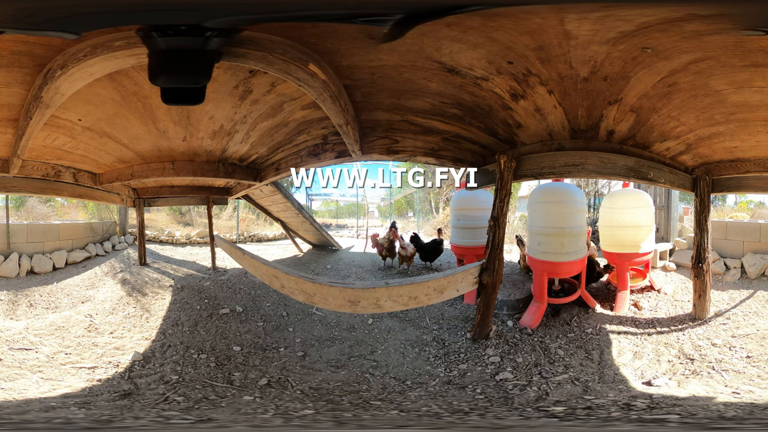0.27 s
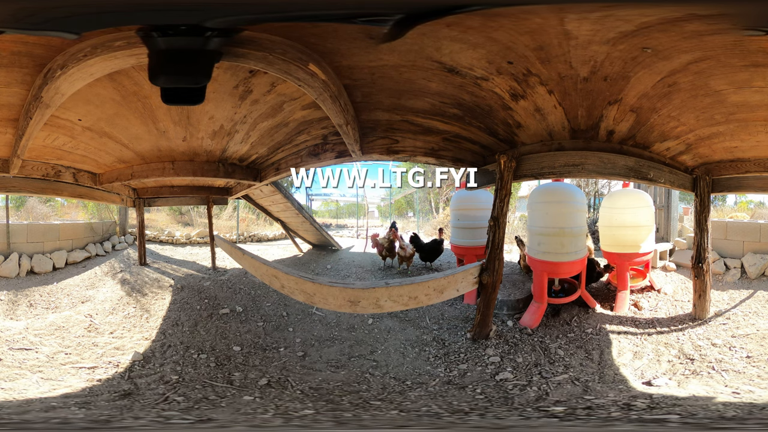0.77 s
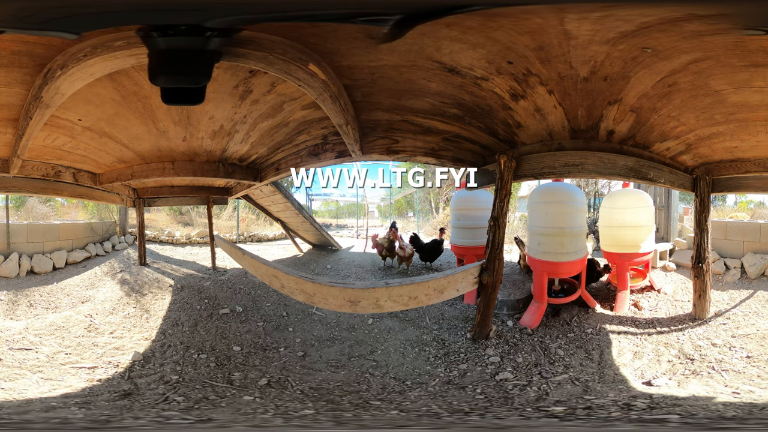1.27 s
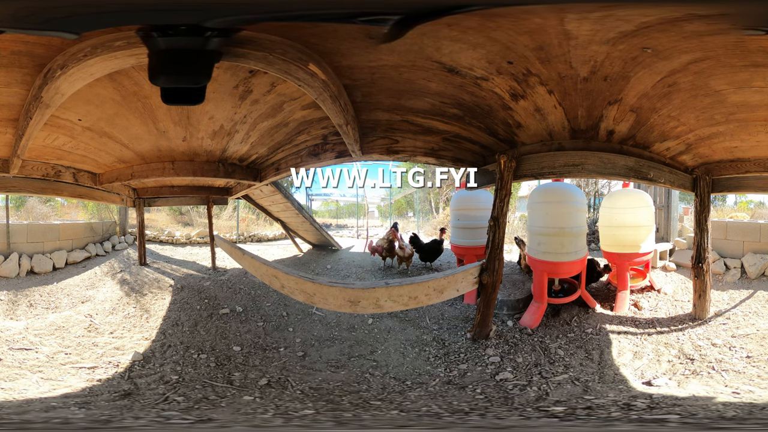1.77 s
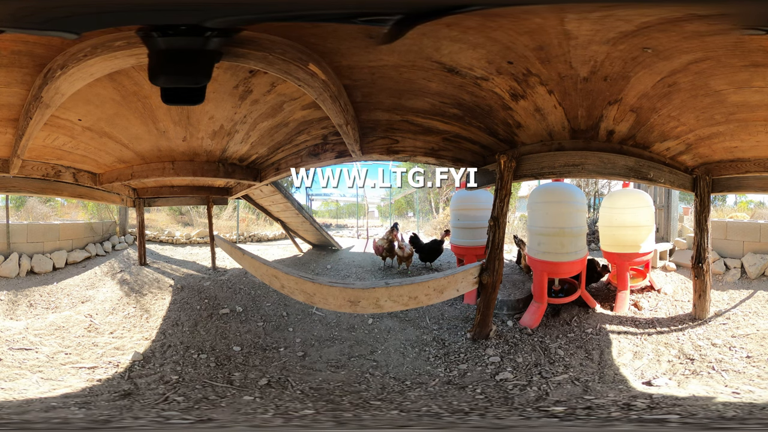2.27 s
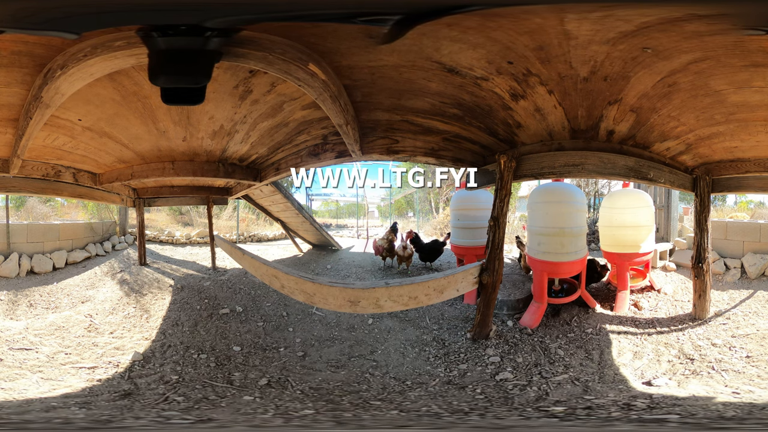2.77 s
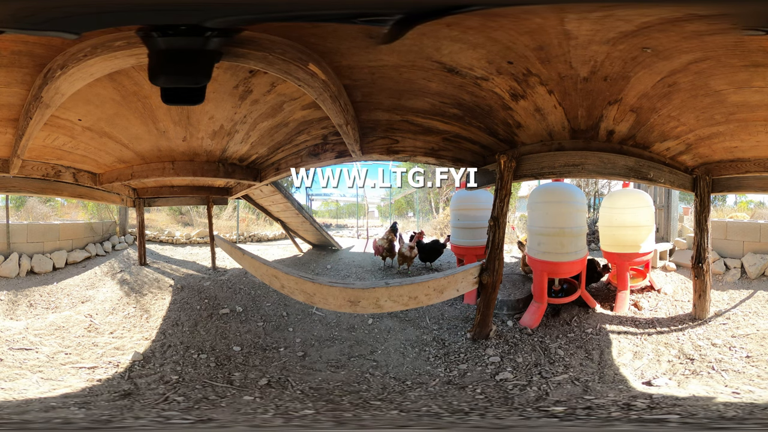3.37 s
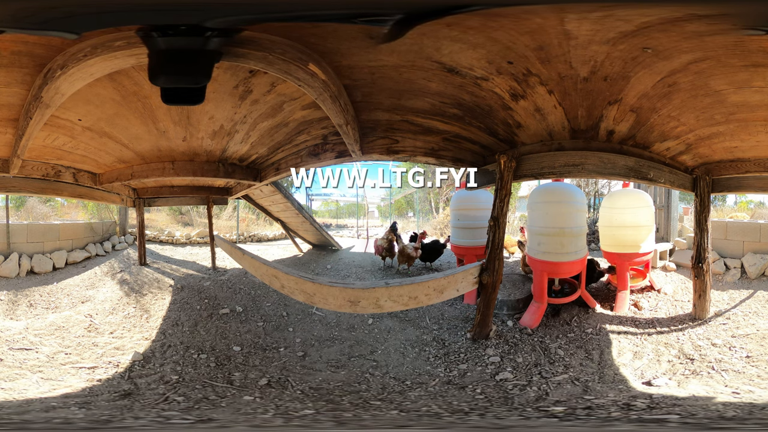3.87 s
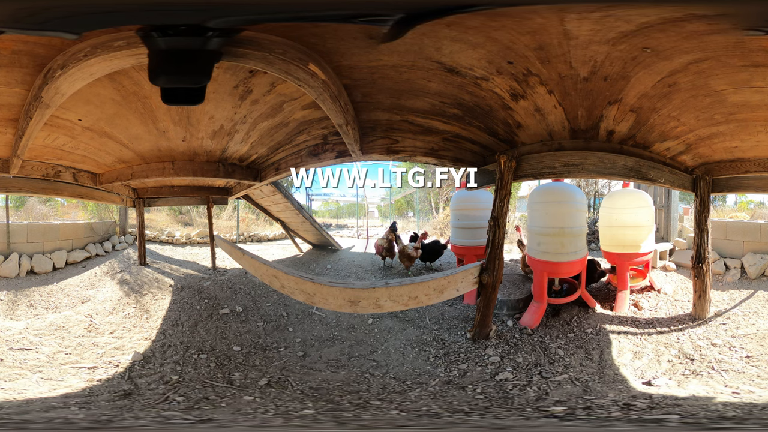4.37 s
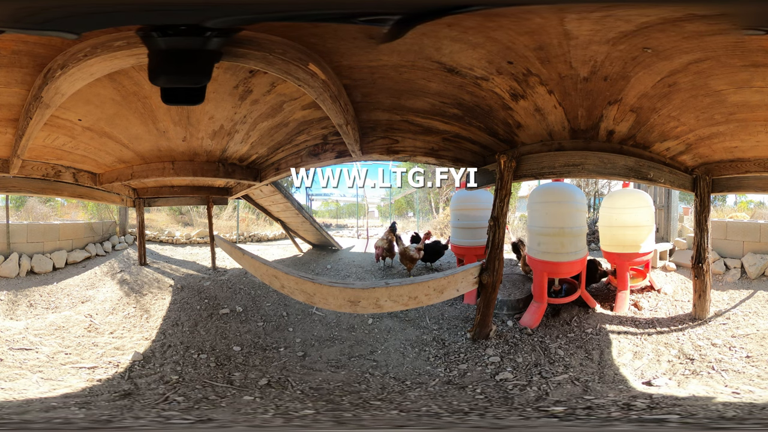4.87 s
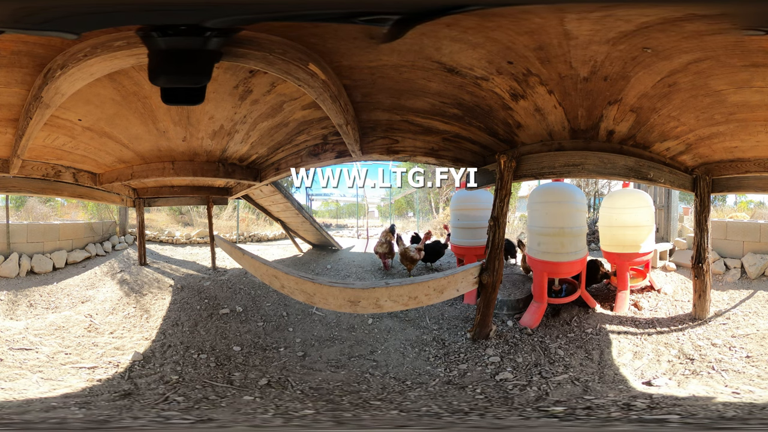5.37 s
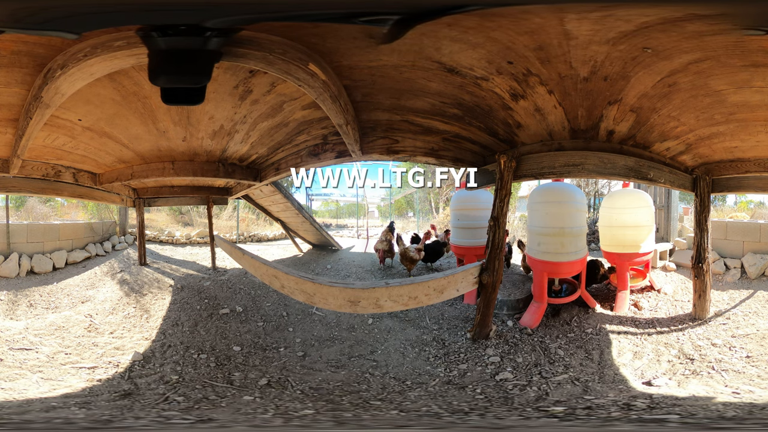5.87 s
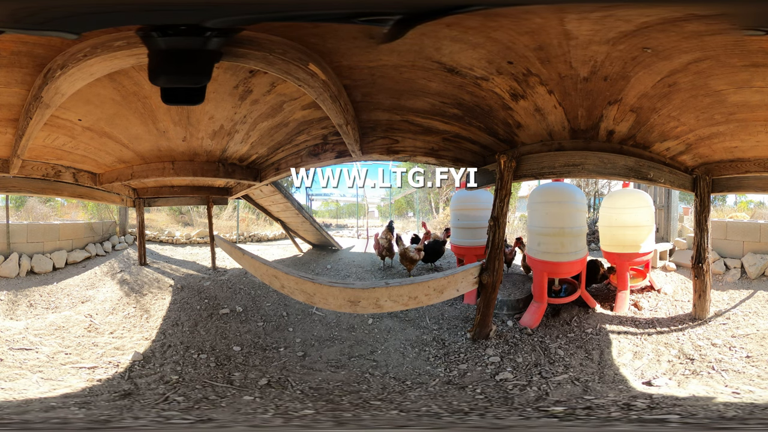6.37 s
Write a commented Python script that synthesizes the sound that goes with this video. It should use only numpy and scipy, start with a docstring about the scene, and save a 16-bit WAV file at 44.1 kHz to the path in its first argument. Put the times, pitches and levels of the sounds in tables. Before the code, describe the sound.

A fixed microphone under a low roof on dry earth picks up a wind rumble at first, then a calm bed of shrill cicadas and faint distant air. Small pecks, dull steps and barely audible hen murmurs are scattered through it. A far low drone swells briefly midway. Near the end, a sharp peck flicks grit, the hollow plastic feeder is knocked, and a hen gives a single clipped cluck.

```python
"""Hens forage under a low wooden shelter: one gives a short cluck, a harmonic voice with period doubling.
Beaks, a plastic feeder, grit and feet are struck or scraped resonators, excited by decaying noise or clicks.
Cicadas sing in the dry scrub around it as trains of tymbal clicks over a hissing chorus.
Behind them lie a faint outdoor rumble of filtered noise and wind that buffets the microphone,
most strongly at first."""
import sys
import numpy as np
from scipy import signal
from scipy.fft import rfft, irfft
from scipy.io import wavfile
from scipy.ndimage import uniform_filter1d

SR = 44100
rng = np.random.default_rng(int(sys.argv[2]) if len(sys.argv) > 2 else 0)


def master(y):
    """Save y as 16-bit WAV."""
    cut = np.clip(np.atleast_2d(y).T, -1, 1)
    pcm = np.round(cut * 32767)  # scale
    wavfile.write(sys.argv[1], SR, pcm.astype(np.int16))


N = 292824
T = np.arange(N) / SR  # time in seconds
HALF = SR // 2  # half a second in samples, the length of every struck sound


def undb(db):
    """Logarithmic level: decibels to amplitude gain."""
    return 10 ** (np.asarray(db) / 20)


def unit(x):
    """Normalisation: scale to rms 1."""
    return x / np.sqrt(np.mean(x ** 2) + 1e-30)


def curves(table):
    """Linear interpolation: each column of a table joined by straight lines in time."""
    s, *columns = np.transpose(table)
    return [np.interp(T, s, c) for c in columns]


def colour(x, points):
    """Spectral shaping: filter by a (Hz, dB) outline, straight in log frequency, then scale to rms 1."""
    hz, db = np.transpose(points)
    f = np.maximum(np.fft.rfftfreq(N, 1 / SR), 1)
    gain = undb(np.interp(np.log(f), np.log(hz), db))
    return unit(irfft(rfft(x) * gain, N))


def resonate(x, hz, q):
    """Resonance: a second-order peak with gain 1 at its centre."""
    return signal.lfilter(*signal.iirpeak(hz, max(q, 4 * hz / SR), fs=SR), x)


def noise():
    """White noise: equal power at all frequencies, for the whole scene."""
    return rng.standard_normal(N)


def burst():
    """White noise: half a second of it, to excite a struck body."""
    return rng.standard_normal(HALF)


def walk(rate):
    """Slow random modulation: held random values, renewed `rate` times a second, smoothed; rms 1."""
    k = int(SR / rate)
    held = np.repeat(rng.standard_normal(N // k + 1), k)
    smooth = uniform_filter1d(uniform_filter1d(held, k), k)
    return unit(smooth[:N])


def fade(t60):
    """Exponential decay: half a second of it, falling 60 dB in t60 seconds."""
    return undb(-60 * T[:HALF] / t60)


def swell(s, length):
    """Amplitude envelope: a rounded rise and fall."""
    return np.sqrt(np.abs(np.sin(np.pi * np.clip((T - s) / length, 0, 1))))


def add(out, s, x, db):
    """Superposition: mix x in at time s with the given peak level."""
    i = max(int(s * SR), 0)
    out[i:i + len(x)] += (x * undb(db) / np.abs(x).max())[:N - i]


# The cluck's course. Each row: time in seconds, pitch in Hz, level in dB, throat rattle from 0 to 1.
CLUCK_COURSE = [(5.985, 1011, -67, 0.01), (6.015, 1010, -48, 0.05), (6.033, 977, -41.5, 0.1),
                (6.046, 1007, -29.5, 0.3), (6.053, 986, -31, 0.85), (6.061, 1020, -33.5, 0.8),
                (6.066, 990, -51, .5), (6.08, 985, -84, 0)]
# The cluck's partials. Each row: multiple of the pitch, level in dB.
# The half multiples sound only with the rattle.
THROAT_PARTIALS = [(.5, -26), (1, -1.5), (1.5, -16), (2, -26.5), (2.5, -39), (3, -44), (3.5, -37), (4, -43)]


def cluck(flutter_hz=290, flutter=0.069, rasp_db=-20):
    """Period doubling: a nearly pure note swells, gains half-multiple partials with a rattle and shuts off."""
    hz, db, rattle = curves(CLUCK_COURSE)
    unsteady_hz = hz * (1 + 0.01 * rattle * walk(400))
    phase = 2 * np.pi * np.cumsum(unsteady_hz) / SR
    voice = np.zeros(N)
    for multiple, partial_db in THROAT_PARTIALS:
        halves = np.round(2 * multiple)
        partial = undb(partial_db) * np.sin(halves / 2 * phase)
        voice += partial * (rattle if halves % 2 else 1)
    voice = voice * (1 + flutter * rattle * np.sin(2 * np.pi * flutter_hz * T))
    rasp = rattle * undb(rasp_db) * unit(resonate(resonate(noise(), 1200, 4.8), 1300, 2.5))
    sounding = (T > CLUCK_COURSE[0][0]) * (T < CLUCK_COURSE[-1][0])
    return (np.sqrt(2) * voice + rasp) * undb(db) * sounding


# Soft murmurs and peeps. Each row: start in seconds, length in seconds, pitch in Hz,
# level in dB before the flicker.
MURMUR_NOTES = [(0.418, 0.1, 1480, -76.5), (0.858, .08, 1957, -67.5), (2.8, 0.14, 1524, -74),
                (3.333, 0.14, 2850, -77), (5.972, 0.047, 3190, -64.5)]


def murmurs(waver=0.036, flicker_db=4.0):
    """Frequency and amplitude modulation: random waver makes thin, hoarse notes from hens further off."""
    notes = np.zeros(N)
    for s, length, hz, db in MURMUR_NOTES:
        phase = 2 * np.pi * hz * np.cumsum(1 + waver * walk(400)) / SR
        notes += undb(db) * swell(s, length) * np.sin(phase)
    return notes * undb(flicker_db * walk(90))


# Pecks of the beak. Each row: time in seconds, peak of the tock in dB, ring in Hz,
# crack in dB relative to the tock.
PECK_BLOWS = [(.604, -58.5, 1450, 3), (.876, -58.5, 2590, 10), (1.455, -55, 1400, -7),
              (1.499, -44.5, 1550, -6), (2.212, -53, 1690, -15), (2.296, -56, 830, -18),
              (2.371, -58, 990, -13), (3.360, -56, 1500, -13), (3.67, -56.5, 2920, 10.5),
              (3.705, -48.5, 3700, -6), (3.904, -62, 795, 5), (3.982, -55, 1367, -3), (4.110, -60, 3300, 8),
              (4.261, -58, 1730, 4), (4.814, -47, 1650, -4), (5.255, -38, 1550, -21.5),
              (5.375, -48, 1280, -14), (6.405, -57, 1700, -8)]
PECK_T60_S = 0.037  # decay of the noise behind every peck


def pecks(ring_q=8.2, crack_hz=3600):
    """Impact excitation: a beak strikes with a broad, sharp crack and a short, hollow, resonant tock."""
    out = np.zeros(N)
    for s, db, hz, crack_db in PECK_BLOWS:
        body = burst() * fade(PECK_T60_S)
        crack = burst() * fade(PECK_T60_S)
        add(out, s, resonate(resonate(body, hz, ring_q), hz, 0.64), db)
        add(out, s, resonate(crack, crack_hz, 1.0), db + crack_db)
    return out


# Blows on the feeder. Each row: time in seconds, peak in dB.
FEEDER_BLOWS = [(5.777, -43), (5.7817, -28.5), (5.7855, -34), (5.79, -43.5)]
# Modes of its plastic shell. Each row: frequency in Hz, relative level in dB, 60 dB decay in seconds.
SHELL_MODES = [(188, -6.5, 0.16), (305, -3, 0.067), (790, -10, 0.048), (1060, -12.5, .03),
               (1297, 4.5, 0.064), (1450, -6, 0.041), (1620, -13, .025), (2600, -33, .015),
               (3480, -9, 0.018)]


def feeder(rattle_db=-9):
    """Modal vibration: blows ring the plastic shell as decaying sines and shake the feed inside."""
    ring = np.zeros(HALF)
    for hz, mode_db, t60 in SHELL_MODES:
        ring += undb(mode_db) * fade(t60) * np.sin(2 * np.pi * hz * T[:HALF])
    out = np.zeros(N)
    for s, db in FEEDER_BLOWS:
        feed = unit(resonate(burst(), 950, 3.2)) * fade(0.13)
        add(out, s, ring + undb(rattle_db) * feed, db)
    return out


# Grit flicked against hard things. Each row: time in seconds, peak in dB, ring in Hz,
# 60 dB decay of the ring in seconds.
GRIT_HITS = [(1.500, -44, 5000, .03), (5.261, -29, 6900, .015), (5.264, -28.5, 5760, .025),
             (5.268, -35, 4340, .015), (5.297, -38, 5200, .03), (5.8014, -25, 6900, 0.016),
             (5.803, -30.5, 5600, 0.01), (5.807, -30.5, 6470, 0.035)]


def grit(tick_t60=0.0041, tick_gain=1.416, tail_t60=0.065, tail_db=-17):
    """Two-stage decay: small hard grains tick brightly, ring for an instant and skitter to rest."""
    out = np.zeros(N)
    for s, db, hz, t60 in GRIT_HITS:
        tick = burst() * (fade(tick_t60) + undb(tail_db) * fade(tail_t60))
        tick = resonate(resonate(tick, hz, 3.8), hz, 5.5)
        ring = fade(t60) * resonate(np.sin(2 * np.pi * hz * T[:HALF]), hz, 3.2)
        add(out, s, ring + tick_gain * tick / np.abs(tick).max(), db)
    return out


# Scratching feet. Each row: start in seconds, length in seconds, level in dB, centre in Hz.
SCRATCH_STROKES = [(0.661, .13, -69.5, 2080), (.846, .085, -68.5, 2100), (1.257, 0.34, -72, 1480),
                   (1.45, .08, -65, 3600), (2.35, 0.24, -71, 1780), (3.207, 0.23, -71, 2500),
                   (3.62, 0.12, -68.5, 2180), (5.26, 0.023, -48, 3670), (5.269, 0.059, -54.5, 2770),
                   (5.28, 0.14, -66, 2170), (5.862, 0.1, -64, 3000), (6.06, 0.051, -68, 1900)]


def scratches(grain_db=3, q=0.41):
    """Granular friction: claws drag through dry dirt in a swell of tiny uneven clicks."""
    out = np.zeros(N)
    for s, length, db, hz in SCRATCH_STROKES:
        struck = rng.random(N) < 3000 / SR  # about 3000 grains a second
        grains = noise() * struck * undb(grain_db * np.minimum(rng.exponential(size=N), 3))
        scrape = unit(resonate(resonate(grains, hz, q), hz, 0.43))
        out += undb(db) * swell(s, length) * scrape
    return out


# Dull footfalls. Each row: time in seconds, peak in dB, body in Hz, 60 dB noise decay in seconds.
FOOTFALLS = [(1.5, -48.5, 191, 0.087), (2.75, -53, 348, 0.28), (2.811, -44.5, 238, 0.071),
             (3.375, -51.5, 296, 0.13), (3.904, -50.5, 383, 0.2), (6.207, -59.5, 406, 0.095)]


def steps(q=1.38):
    """Damped impact: feet land on packed earth with a soft, low-resonant thud."""
    out = np.zeros(N)
    for s, db, hz, t60 in FOOTFALLS:
        add(out, s, resonate(resonate(burst() * fade(t60), hz, q), hz, q), db)
    return out


def litter(count=70, peak_db=-67, spread_db=6.5, centre_hz=2000):
    """Random impacts: the rest of the flock stirs husks and pebbles in faint ticks of varied pitch."""
    out = np.zeros(N)
    for s, size, pitch in rng.random((count, 3)):
        tick = burst() * fade(0.13)
        hz = centre_hz * 2 ** (2 * pitch - 1)  # within an octave either way
        tick = resonate(resonate(tick, hz, 3.2), hz, 0.49)
        add(out, s * T[-1], tick, peak_db + spread_db * (2 * size - 1))
    return out


def shelter(x, t60=0.1, wet_db=-22, dull_hz=8000):
    """Absorption and reverberation: dirt swallows the top treble; the low roof returns a short, dull tail."""
    lowpass = signal.butter(3, min(dull_hz, .45 * SR), fs=SR, output="sos")
    x = signal.sosfilt(lowpass, x)
    late = T[:HALF] > .004  # the tail begins after 4 ms
    tail = resonate(burst() * fade(t60) * late, 1800, 1.0)
    return x + undb(wet_db) * signal.fftconvolve(x, tail / np.linalg.norm(tail))[:N]


# Rates in Hz at which the near singers repeat their run of rib clicks: first singer, second singer.
RUN_HZ = (76.04, 33.06)


def cicada(hz, count, rib_spread_s=1.5e-5, jitter_s=6.5e-6, drift=.00045, scatter=1.0):
    """Buckling: each tymbal stroke snaps the same ribs in turn, a repeating run of alternating clicks."""
    k = np.arange(int(N / SR * hz * count))
    rib = k % count
    s = k / (hz * count)
    s = s + np.interp(s, T, np.cumsum(drift * walk(3)) / SR)
    s = s + rib_spread_s * rng.standard_normal(count)[rib] + jitter_s * rng.standard_normal(len(k))
    size = (-1) ** rib * undb(2.0 * rng.standard_normal(count))[rib]
    # a short sinc places each click between samples
    taps = (s * SR).astype(int)[:, None] + np.arange(-8, 9)
    pulses = size[:, None] * np.sinc(taps - s[:, None] * SR)
    clicks = np.bincount(taps.ravel() % N, pulses.ravel(), N)
    # ground and roof smear every click
    echoes = burst() * fade(0.068)
    return unit(clicks + scatter * signal.fftconvolve(clicks, echoes / np.linalg.norm(echoes))[:N])


# Course of the song. Each row: time in seconds, level in dB before the song gain,
# low resonance in dB, used relative to the median of its column.
SONG_COURSE = [(0, -51.5, -2), (.55, -52.5, 6), (.9, -51.5, 6.5), (1.35, -49.5, 1), (1.85, -47.5, 0),
               (2.3, -49, 0.5), (2.8, -49.5, -2), (4.2, -48.5, -4.5), (4.8, -48.5, -1), (5.5, -49, 2),
               (6.64, -49.5, 0.5)]
# Balance of the two nearest cicadas. Each row: time in seconds, first singer in dB, second singer in dB,
# weighed against the chorus before the mix is levelled.
SOLO_BALANCE = [(0, -0.5, -38), (.8, 1, -8), (2.1, -0.5, -12), (2.8, 0, -3), (4.1, -4, -8.5),
                (4.9, 0.5, -4), (6.64, 1, 0)]
# Spectrum of the song. Each row: frequency in Hz, relative level in dB.
SONG_SPECTRUM = [(4000, -37.5), (4700, -21.5), (5700, -3), (6200, -1.5), (6700, -5), (7700, 1.5),
                 (8450, -1), (8950, -10), (9550, -4.5), (10500, -20.5), (11300, -34), (12300, -55),
                 (14200, -26), (15700, -45.5)]


def cicadas(chorus_db=-0.5, song_db=1.5):
    """Incoherent summation: two near singers shift in balance over a far chorus blurred into hiss."""
    first_db, second_db = curves(SOLO_BALANCE)
    level_db, low_db = curves(SONG_COURSE)
    a, b, far = undb(first_db), undb(second_db), undb(chorus_db)
    song = a * cicada(RUN_HZ[0], count=6) + b * cicada(RUN_HZ[1], count=7) + far * noise()
    song = colour(song / np.sqrt(a ** 2 + b ** 2 + far ** 2), SONG_SPECTRUM)
    # the abdomen's low resonance opens and closes
    opening = undb(low_db - np.median(low_db)) - 1
    song = song + opening * resonate(song, 6280, 2.4)
    return song * undb(level_db + song_db + 0.3 * walk(18))


# Spectrum of the wind noise. Each row: frequency in Hz, relative level in dB.
WIND_SPECTRUM = [(10, 0), (25, 3.5), (60, -4), (110, -11.5), (185, -17.5), (270, -43.5), (420, -63),
                 (2000, -140)]
# Gusts on the microphone. Each row: start in seconds, hold in seconds, level in dB before the wind gain.
GUST_COURSE = [(0.011, 0.02, -23), (0.119, .11, -23), (.28, 0.11, -44), (0.435, 0.28, -34.5),
               (.8, 0.17, -43.5), (2.589, 0.092, -44.5), (4.16, 0.094, -46), (4.545, 0.16, -51),
               (6.225, 0.035, -50.5)]
# Single eddies. Each row: time in seconds, pressure peak in dB, swing rate in Hz.
EDDY_SWINGS = [(0.029, -26, 62.7), (0.125, -19.5, 56), (.173, -31, 96), (0.225, -16, 66),
               (0.458, -32.5, 122), (0.483, -28, 74.6), (.675, -25.5, 28)]
GUST_ATTACK_S, GUST_RELEASE_S = 0.016, 0.033  # time constants of every gust
LULL_DB, LULL_WANDER_DB = -61.5, 4  # light air between the gusts, before the wind gain


def wind(wind_db=-5):
    """Turbulent pressure: gusts rise, hold and die back to a lull; each big eddy is one swing of pressure."""
    strength = undb(LULL_DB + LULL_WANDER_DB * walk(6))
    for s, hold, db in GUST_COURSE:
        before = np.maximum(s - T, 0) / GUST_ATTACK_S
        after = np.maximum(T - s - hold, 0) / GUST_RELEASE_S
        strength = np.hypot(strength, undb(db) * np.exp(-(before + after)))
    out = colour(noise(), WIND_SPECTRUM) * strength * undb(wind_db)
    for s, db, hz in EDDY_SWINGS:
        u = (np.pi * hz * (T - s)) ** 2
        out += undb(db) * (1 - 2 * u) * np.exp(-u)
    # the wind fades in from silence at the start
    return out * np.sin(np.pi / 2 * np.minimum(T / GUST_ATTACK_S, 1)) ** 2


# Spectrum of distant outdoor air. Each row: frequency in Hz, relative level in dB.
AIR_SPECTRUM = [(15, -37), (25, -1.5), (58, -3), (106, -5.5), (173, -1.5), (281, -7.5), (489, -13.5),
                (658, -19), (905, -25), (1030, -19), (1270, -18), (2070, -26), (4000, -30.5), (5200, -35),
                (8800, -120)]
# the air grows a little louder, then holds, apart from a slow wander
AIR_START_DB, AIR_END_DB, AIR_RISE_S = -65, -61, 4.0
# a far drone swells once and dies away; the width is from the peak to half amplitude
DRONE_HZ, DRONE_DB = 165, -65
DRONE_SWELL_DB, DRONE_PEAK_S, DRONE_WIDTH_S = -52.5, 3.39, 0.26


def air():
    """Band-shaped noise: a distant outdoor bed with a low resonant drone that swells once."""
    drone = unit(resonate(resonate(noise(), DRONE_HZ, 3.2), DRONE_HZ, 3.2))
    passing = undb(DRONE_SWELL_DB) / (1 + ((T - DRONE_PEAK_S) / DRONE_WIDTH_S) ** 2)
    bed_db = np.interp(T, [0, AIR_RISE_S], [AIR_START_DB, AIR_END_DB]) + 1.36 * walk(4.617)
    bed = colour(noise(), AIR_SPECTRUM) * undb(bed_db)
    return bed + drone * np.hypot(undb(DRONE_DB), passing)


def scene():
    """Superposition: the flock under its roof, with cicadas, wind and air around it."""
    voices = cluck() + murmurs()
    foraging = pecks() + feeder() + grit() + scratches() + steps() + litter()
    return (shelter(voices + foraging) + cicadas() + wind() + air())[None]


TOP_HZ = 15730  # upper limit of the recorded band


def record(dry):
    """Band limiting: a steep elliptic low-pass cuts the top."""
    return signal.sosfilt(signal.ellip(10, .2, 70, TOP_HZ, fs=SR, output="sos"), dry)


dry = scene()
out = record(dry)
master(out)
```